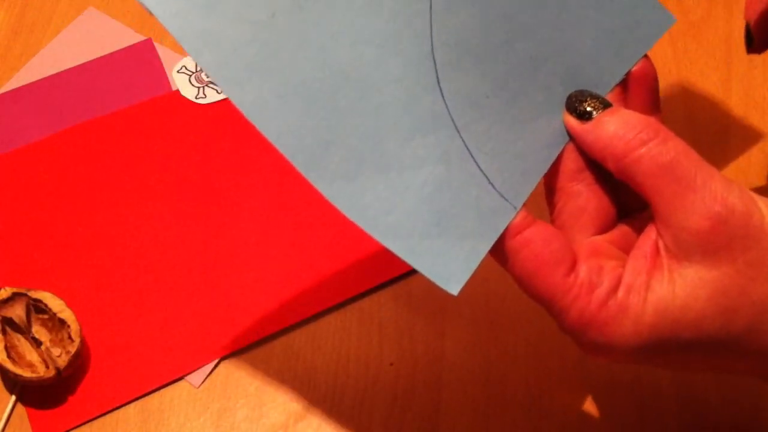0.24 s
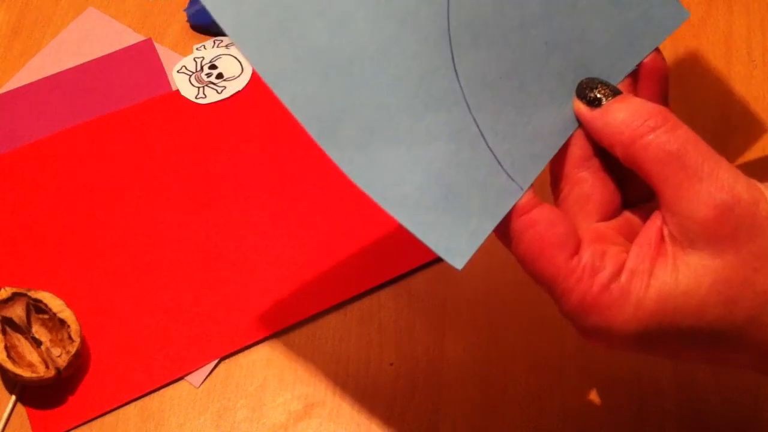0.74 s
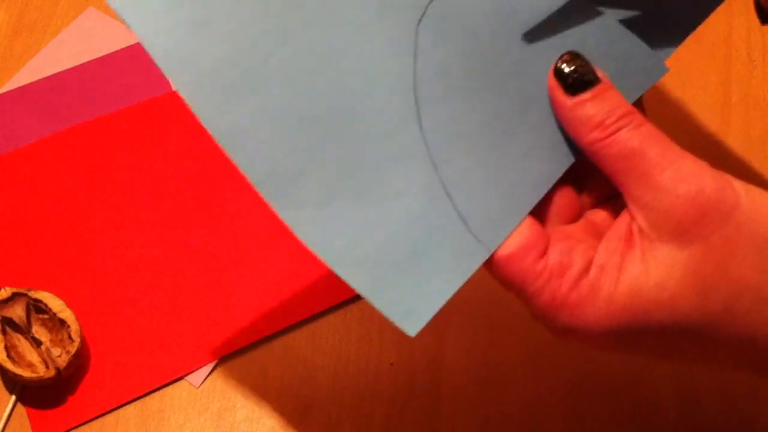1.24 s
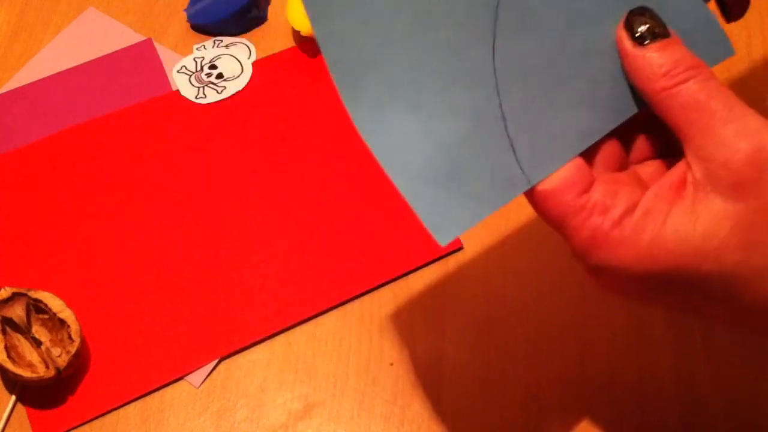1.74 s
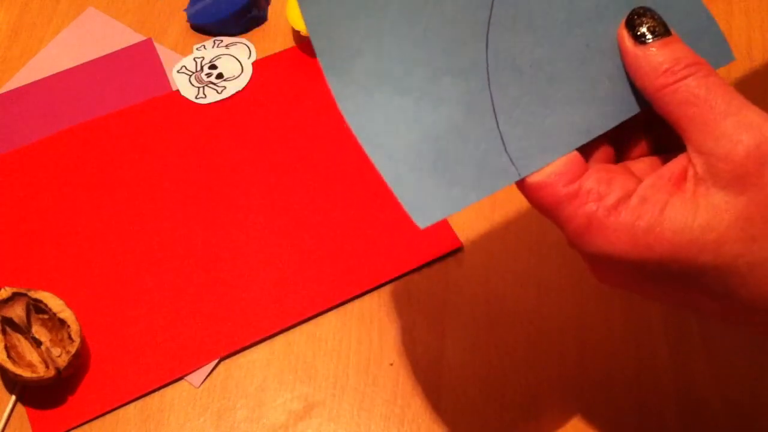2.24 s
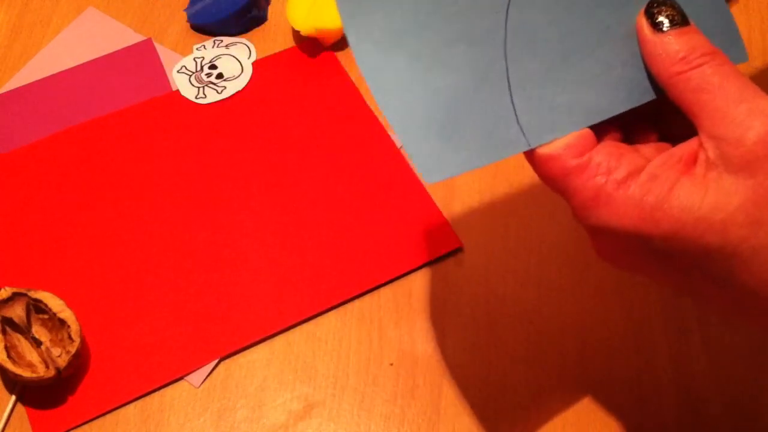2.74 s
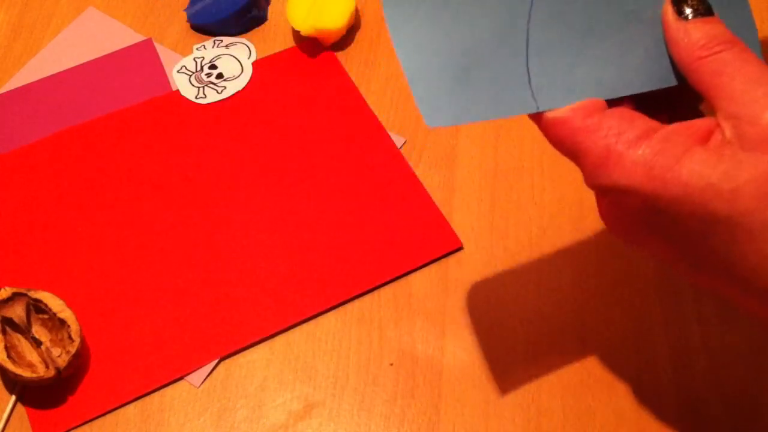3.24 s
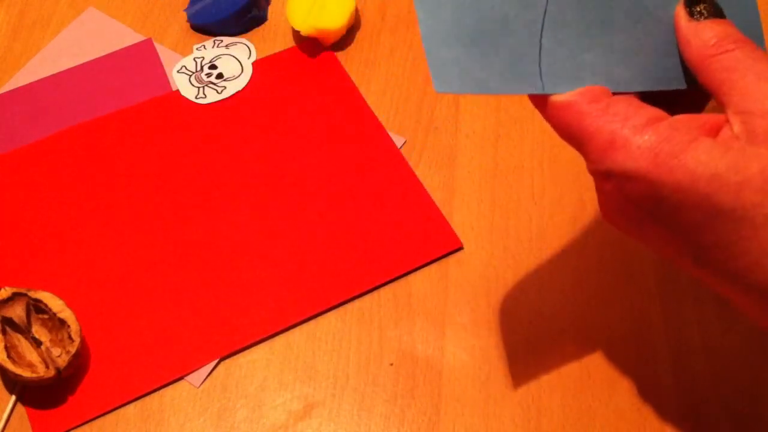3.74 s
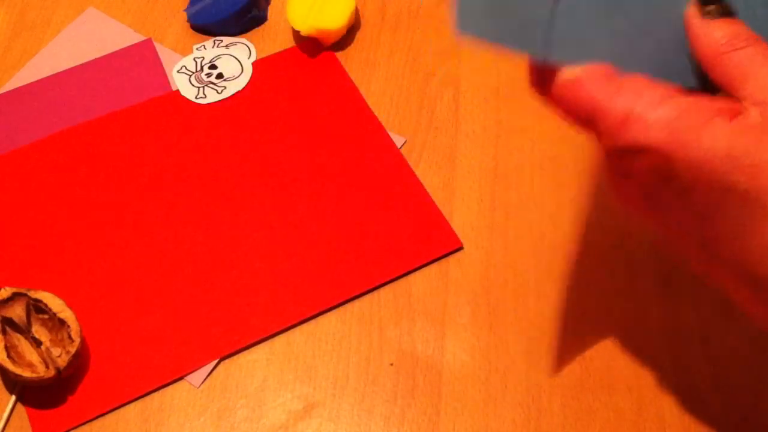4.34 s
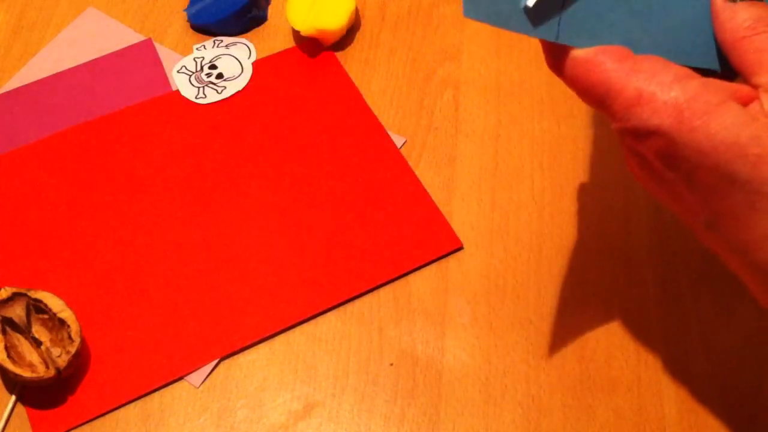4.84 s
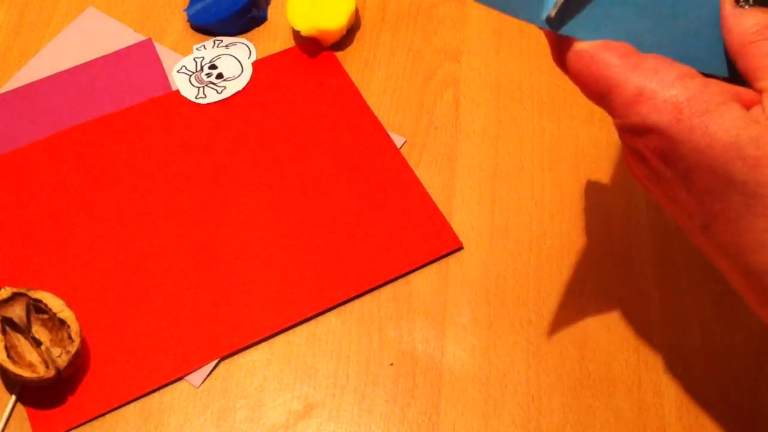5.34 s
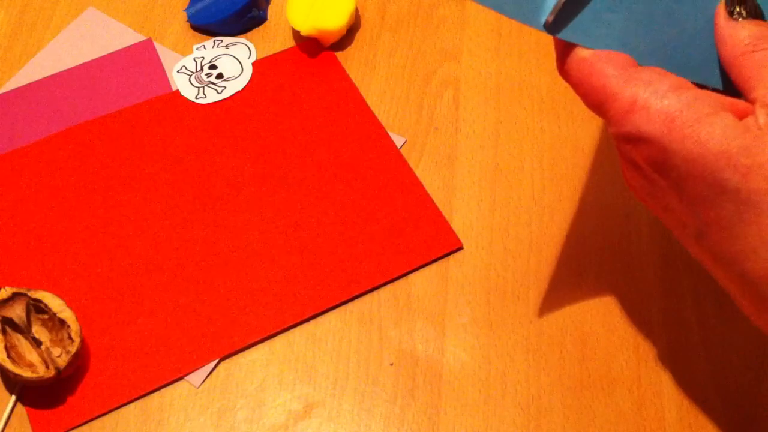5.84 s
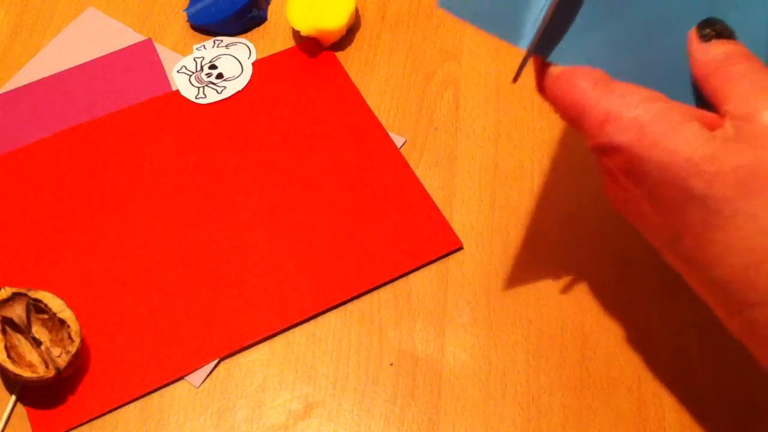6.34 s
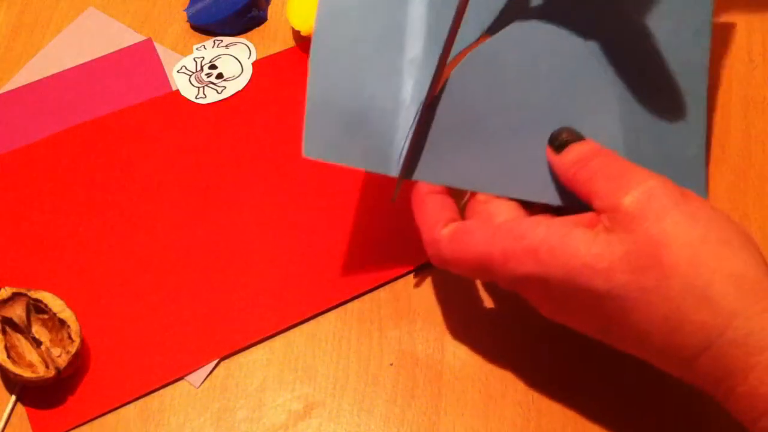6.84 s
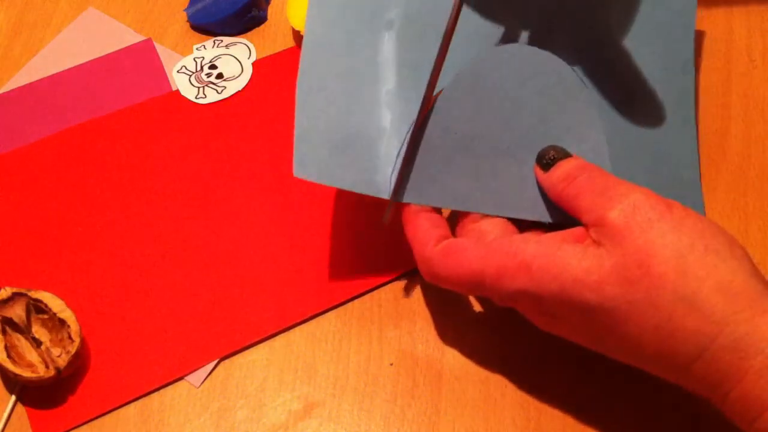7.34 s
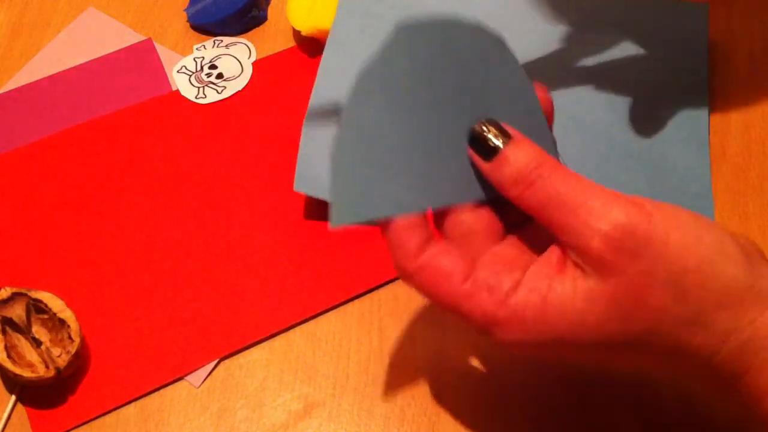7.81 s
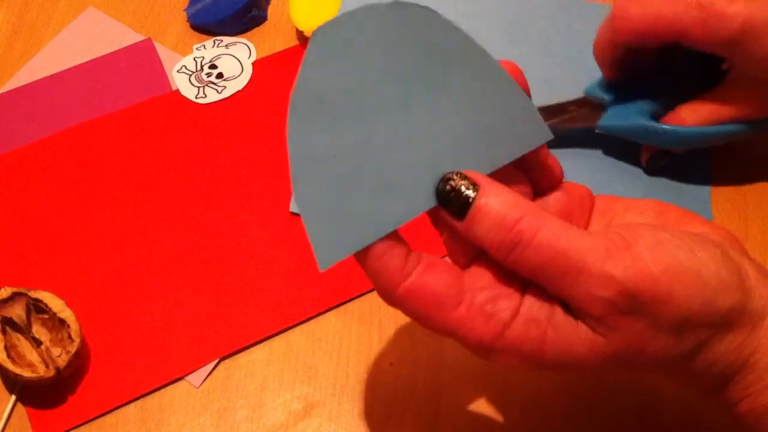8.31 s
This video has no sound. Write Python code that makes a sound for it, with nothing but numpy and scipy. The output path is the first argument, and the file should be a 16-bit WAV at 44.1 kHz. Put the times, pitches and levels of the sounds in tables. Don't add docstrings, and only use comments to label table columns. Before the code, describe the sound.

Close, dry crackling of stiff card being snipped in a quiet room, ending with a bright metallic blade snap and light sheet rustle.

```python
import sys
import numpy as np
from scipy import signal
from scipy.fft import rfft, irfft
from scipy.io import wavfile
from scipy.ndimage import uniform_filter1d, minimum_filter1d

SR = 44100
rng = np.random.default_rng(int(sys.argv[2]) if len(sys.argv) > 2 else 0)


def bounce(signal):
    frames = np.transpose(np.atleast_2d(signal))
    limited = np.clip(frames, -1, 1)
    pcm = np.round(limited * 32767).astype(np.int16)
    wavfile.write(sys.argv[1], SR, pcm)


def gain_from_decibels(decibels):
    exponent = np.asarray(decibels, float) / 20
    return 10 ** exponent


N = 377937

# centre in Hz, width in Hz, level in dB.
CRACKLE = [(1757, 970, 0.5), (2760, 1380, 1), (3590, 1080, 0), (5240, 1780, 1), (6410, 3400, -5)]
# centre in Hz, width in Hz, level in dB.
FIZZ = [(9100, 2660, -8), (12500, 2460, 5), (15600, 1300, -3.5)]


def bursts():
    panel_band_hz = [330, 1500]
    out, lead = np.zeros(N + SR), SR // 40
    t = (np.arange(SR // 10) - lead) / SR
    push = np.pad(fibres(spread_db=2.0), (lead, SR))
    radiated = signal.butter(1, panel_band_hz, "band", fs=SR)
    for s, db, panel_db, fizz_db, rise_ms, panel, rings in knocks() + slips() + ticks() + brushes():
        at = slice(int(s * SR), int(s * SR) + len(t))
        rise = 0.8 * np.clip(rise_ms, 0.2, 12) / 1000
        swell = np.where(t < 0, np.exp(-(t / rise) ** 2), np.exp(-np.abs(t) / (0.0015 + 0.94 * rise)))
        swell += 5.2 * np.exp(-rise / 0.00043 - np.abs(t) / 0.0001)
        burst = push[at] * swell
        burst *= gain_from_decibels(db) * np.linalg.norm(swell) / np.linalg.norm(burst)
        sudden = np.exp(-rise / 0.0017)
        flick = np.linalg.norm(burst) * (t == 0)
        jolt = np.sqrt(1 - sudden) * burst + np.sqrt(sudden) * flick
        out[at] += lifted(body(burst, tilted(CRACKLE, fizz_db)), rings)
        out[at] += gain_from_decibels(fizz_db) * body(burst, FIZZ)
        ringing = unit(body(signal.lfilter(*radiated, jolt), panel))
        out[at] += gain_from_decibels(panel_db + 1.5) * np.std(jolt) * ringing
    return out[lead:lead + N]


def knocks():
    # peak in seconds, crackle in dB, panel in dB re crackle, panel in Hz, rise in ms.
    knock_rows = [(0.028, -57.5, 8.5, 686, 1.8), (0.1102, -50.5, 16, 658, 1.6),
                  (0.6216, -38.5, 8.5, 710, 0.97), (0.7156, -32, 6, 625, 3.6),
                  (0.9661, -33.5, 11, 600, 1.17), (1.392, -49.5, 0.5, 560, 6.1),
                  (2.1179, -49.5, 1.5, 700, 2.7), (2.685, -50.5, 18, 646, 1.3),
                  (2.6933, -41.5, 10, 860, 2.9), (2.7078, -49, -3, 363, 3.3), (2.7369, -39, 0.5, 714, 2.9),
                  (2.762, -51.5, 9.5, 744, 2.5), (2.82, -51, 3.5, 730, 6.8), (2.9528, -43.5, 1, 640, 3.3),
                  (2.977, -44, 0.5, 706, 3.9), (2.9898, -51.5, 10.5, 700, 1.4),
                  (3.76, -39.5, 1.5, 682, 0.96), (4.1417, -42.5, 4.5, 580, 3.2),
                  (4.2045, -33, 2.5, 596, 1.9), (4.5533, -44, 3.5, 627, 0.79),
                  (5.0109, -38, -0.5, 710, 3.7), (5.247, -47.5, 3.5, 636, 2.9), (5.299, -47, 1.5, 636, 3.8)]
    rows = []
    for s, db, panel_db, hz, rise_ms in knock_rows:
        grip = [(hz, 55, 0), (1.445 * hz, 150, -9.5), (0.84 * hz, 70, -7), (2.4 * hz, 300, -15),
                (0.66 * hz, 150, -14)]
        fizz_db = edge(s) - 1.5 + 0.2 * panel_db
        rows.append((s, db, panel_db, fizz_db, rise_ms, grip, bent_rings(s)))
    return rows


def slips():
    # peak in seconds, crackle in dB, panel in dB re crackle, rise in ms.
    at_pivot = [(3.7113, -41.5, -2.5, 0.91), (3.993, -36.5, -1.5, 1.76), (4.002, -49, -12, 8.6),
                (4.1873, -28.5, -4.5, 2.7), (4.2646, -46.5, -11, 1.3), (5.6704, -44.5, -9, 2.2),
                (5.8205, -44.5, -10, 1.1), (6.4414, -44.5, -7, 4.7), (7.1487, -43, -27, 2),
                (7.2256, -53.5, -12.5, 6.9), (7.366, -46.5, -8.5, 1.5)]
    inner = [(0.216, -48.5, -34, 7.1), (1.0067, -47, -5, 7.3), (1.1234, -40.5, -33, 5.1),
             (2.0563, -57, -2, 2.8), (2.1346, -45.5, -4, 2.4), (2.174, -47.5, 0, 5.3),
             (2.3242, -46.5, 3, 4.3), (3.8809, -32, -3.5, 1.3), (4.0833, -35, 0.5, 1.1),
             (5.0625, -43.5, -3, 4.7), (5.621, -34, -7.5, 3), (5.734, -54, -2, 2.2),
             (5.7864, -42.5, -11, 4), (6.2507, -48.5, -9, 2.4), (6.2622, -58, -4, 2.5)]
    middle = [(0.012, -56, -1, 1.3), (0.7383, -50, -5, 3.2), (1.676, -45, -9, 8.8), (2.4116, -55, -3, 2.9),
              (2.9275, -49, -3.5, 5.6), (3.3614, -52, -24, 1.2), (4.2168, -39.5, -8.5, 3.2),
              (4.9783, -46.5, -0.5, 2.9), (5.377, -53.5, -4, 3.8), (5.4836, -44, -3.5, 4.7),
              (5.6412, -41, -12, 2.4), (6.0145, -42.5, -16, 4.6), (7.4449, -31, -11.5, 3.2),
              (7.4474, -24.5, -42.5, 0.63), (8.0704, -41, -14, 0.8)]
    outer = [(6.8497, -52.5, -19, 1.3), (7.439, -44, -24, 1.5), (7.533, -40, -24, 1),
             (7.5459, -52.5, -6, 6.1), (8.0825, -36, -15, 0.6), (8.3828, -40.5, -8.5, 1.6)]
    at_tips = [(1.6065, -37.5, -18, 2.1), (2.0784, -52, -2, 1.8), (2.0976, -45.5, -4, 4.8),
               (2.207, -49.5, -12, 2.8), (2.4235, -51.5, -4, 1.9), (2.4925, -38.5, -4, 4.6),
               (2.521, -40.5, -2, 2.5), (2.5861, -39.5, -3.5, 3.8), (3.4029, -28, -13.5, 1.6),
               (4.329, -51, -12, 1.2), (4.9471, -37.5, -9.5, 5.7), (5.1353, -45, -6, 7.8),
               (5.366, -47, -19, 3.4), (6.2796, -44.5, -3.5, 3.5), (6.3041, -36.5, -18, 3.1),
               (6.7401, -44, -7.5, 2.1), (7.1132, -49, -11.5, 2.3), (7.1258, -44, -13, 2),
               (7.5658, -49, -8, 2.2)]

    def at_place(slip_rows, crackle_hz, fizz_db):
        return [contact(s, db, panel_db, edge(s) + fizz_db, rise_ms, crackle_hz)
                for s, db, panel_db, rise_ms in slip_rows]

    rows = at_place(at_pivot, crackle_hz=1365, fizz_db=-2.3)
    rows += at_place(inner, crackle_hz=2180, fizz_db=0.5)
    rows += at_place(middle, crackle_hz=3600, fizz_db=1)
    rows += at_place(outer, crackle_hz=4300, fizz_db=-1.7)
    return rows + at_place(at_tips, crackle_hz=5110, fizz_db=-2.6)


def ticks():
    # peak in seconds, level in dB.
    tick_rows = [(1.4108, -65), (1.927, -64), (3.609, -56.5), (3.657, -55), (4.053, -62), (4.24, -57),
                 (4.8017, -60), (4.92, -60), (5.211, -56), (5.7, -57), (6.1271, -62), (6.8878, -60)]
    return [contact(s, db, -9, edge(s), rise_ms=1.5, place_hz=2700) for s, db in tick_rows]


def brushes():
    # peak in seconds, level in dB, panel in dB re crackle.
    brush_rows = [(0.093, -66, 0.5), (0.348, -64, -1), (0.439, -67, 2), (1.0436, -67, 4), (1.095, -61, 1.5),
                  (1.45, -61, 0), (1.523, -60, -7), (1.5385, -68, -12), (1.6914, -79, 7),
                  (2.3706, -67, -10), (2.4634, -65, -16), (2.883, -59.5, -2), (3.1, -61, -4),
                  (3.3224, -71, -17), (4.2893, -68, -2), (4.6604, -50, -18), (4.688, -58, -8),
                  (5.422, -61, -5), (7.828, -71, -24.5), (7.912, -63.5, 1), (8.565, -66, 6),
                  (8.1644, -64, -20)]
    return [contact(s, db, panel_db, edge(s), rise_ms=14, place_hz=1900) for s, db, panel_db in brush_rows]


def contact(s, db, panel_db, fizz_db, rise_ms, place_hz):
    sheet = [(265, 90, 0.5), (430, 200, -2.5), (bend(s)[0], 90, 5), (1050, 400, -7)]
    rings = bent_rings(s) + [(place_hz, 0.15 * place_hz, 2)]
    return s, db, panel_db, fizz_db, rise_ms, sheet, rings


def bent_rings(s):
    return [(hz, 0.047 * hz, 4) for hz in bend(s)[1:]]


def bend(s):
    # start in seconds, panel in Hz, low ring in Hz, high ring in Hz.
    bend_rows = [(0.206, 867, 2550, 2960), (0.616, 724, 1570, 5740), (0.709, 650, 2420, 4570),
                 (0.96, 630, 2510, 6740), (1.116, 896, 1830, 4900), (1.386, 600, 2265, 4200),
                 (1.6, 640, 1820, 4780), (1.776, 750, 2350, 2900), (2.091, 690, 3000, 5180),
                 (2.168, 920, 2410, 5060), (2.296, 817, 1800, 3570), (2.486, 537, 2280, 5050),
                 (2.516, 745, 2390, 5030), (2.58, 727, 1930, 5210), (2.688, 887, 1756, 4590),
                 (2.731, 770, 2370, 4840), (2.946, 669, 2770, 4980), (3.396, 720, 2440, 5000),
                 (3.705, 920, 1520, 5920), (3.754, 760, 1603, 4000), (3.876, 780, 1830, 4130),
                 (3.987, 420, 1880, 5400), (4.078, 736, 1890, 6160), (4.136, 547, 1780, 4000),
                 (4.181, 647, 1750, 6100), (4.199, 634, 1780, 4750), (4.366, 656, 2370, 5360),
                 (4.406, 916, 2870, 2900), (4.446, 740, 2300, 3580), (4.547, 620, 2330, 5400),
                 (4.571, 730, 2406, 5750), (4.606, 920, 2430, 5400), (4.656, 750, 2350, 4580),
                 (4.716, 685, 2440, 4840), (4.941, 896, 2710, 4030), (5.004, 726, 2420, 5050),
                 (5.056, 670, 2620, 6220), (5.129, 887, 2780, 4820), (5.357, 713, 1860, 4160),
                 (5.477, 665, 2740, 5580), (5.613, 645, 2180, 5240), (5.781, 758, 2370, 5820),
                 (6.008, 706, 2850, 5400), (6.296, 410, 2685, 5330), (6.435, 643, 2950, 3000),
                 (7.121, 1090, 1860, 4860), (7.43, 650, 2500, 5430), (7.527, 500, 2960, 3584),
                 (8.066, 670, 2620, 3120), (8.377, 1100, 2700, 4100)]
    table = np.array(bend_rows)
    latest = np.clip(np.searchsorted(table[:, 0], s) - 1, 0, None)
    return table[latest, 1:].T


def edge(s):
    # time in seconds, fizz in dB re crackle or rasp.
    facing = [(0, -9), (0.45, -33), (0.75, -11), (1.05, -8.5), (1.4, -15.5), (1.7, -12.5), (2.1, -7.5),
              (2.5, -12), (3.2, -3.5), (3.9, -11), (4.7, -5), (5.1, -1.5), (5.6, -2), (6.7, -2),
              (7.4, -3.5), (7.6, -6), (8.57, -7.5)]
    return np.interp(s, *np.transpose(facing))


def card_rubs():
    # peak in seconds, rise in ms, fall in ms, rasp in dB, panel in dB re rasp.
    cuts = [(1.6, 54, 34, -56, -5.5), (1.8, 36.5, 57, -46.5, -11.5), (2.31, 46, 51, -57, -8),
            (2.97, 59, 40, -56.5, 0.5), (3.05, 37, 32.5, -56.5, -4.5), (3.402, 25.3, 28, -48.5, -9.5),
            (3.66, 66, 64, -60, -17), (3.74, 50, 74, -56, -11), (4.2, 30, 52, -52.5, 0),
            (4.411, 11, 77, -47.5, -12.5), (4.462, 62, 47, -46, -10), (4.59, 46.7, 106, -49, -9),
            (4.73, 55, 66, -55, -14), (5.24, 33, 61, -59.5, -6.5), (5.83, 24, 49, -62.5, -4),
            (6.035, 20, 70.5, -48.5, -16.5), (6.62, 43, 28, -64, -26), (6.72, 51, 45, -55.5, -19),
            (8.24, 35, 53, -58.5, -21)]
    # peak in seconds, fall in ms, rasp in dB, panel in dB re rasp.
    scrapes = [(0.213, 17.7, -64.5, 9), (0.731, 41, -56.5, 4.5), (0.977, 66, -46.5, -5),
               (1.129, 50, -58, 0.5), (1.616, 45, -42.5, -14), (1.717, 28, -52.5, -1.5),
               (4.377, 19.5, -46.5, -5.5), (5.368, 18, -58.5, -3), (5.64, 94, -65, -0.5),
               (7.458, 55, -50, -13), (7.545, 44, -63.5, 1), (8.09, 36, -55, -13)]
    # peak in seconds, length in ms, rasp in dB, panel in dB re rasp.
    rustles = [(0.01, 61, -70, 15.5), (0.28, 50, -69.5, -0.5), (0.42, 240, -75, 1.5),
               (1.065, 93, -60, -3.5), (1.45, 220, -61.5, -6), (2.139, 250, -64, -2), (2.395, 104, -65, -6),
               (2.61, 383, -61, -4.5), (2.74, 120, -78, 5), (3.25, 470, -68, -24), (3.865, 126, -60, -7.5),
               (4.995, 150, -80.5, 15), (6.274, 96, -64.5, 4), (6.875, 97, -68, -3.5),
               (7.14, 66, -74.5, 3.5)]
    rows = list(cuts)
    rows += [(s, 14.3, fall_ms, db, panel_db) for s, fall_ms, db, panel_db in scrapes]
    rise_share = 0.39
    rows += [(s, rise_share * ms, (1 - rise_share) * ms, db, panel_db) for s, ms, db, panel_db in rustles]
    rows = [(*row, edge(row[0]) + 1.2) for row in rows]
    return strokes(rows, CRACKLE, grit_db=2.5, ring_db=-9.5, patchy_db=2.5)


def paper_swishes():
    # peak in seconds, rise in ms, fall in ms, level in dB, fizz in dB.
    swishes = [(7.825, 36, 50, -66, 5), (7.925, 55, 100, -57, -6), (8.0, 350, 1400, -72, -2.5),
               (8.56, 51, 140, -51.5, -4), (8.5, 43, 36, -62, -11)]
    # centre in Hz, width in Hz, level in dB.
    paper = [(2500, 2100, -5.5), (5300, 1100, 2.5), (7500, 2200, -7)]
    panel_db = -20.5
    rows = [(s, rise_ms, fall_ms, db, panel_db, fizz_db) for s, rise_ms, fall_ms, db, fizz_db in swishes]
    return strokes(rows, paper, grit_db=2.5, ring_db=-19, patchy_db=0.7)


def strokes(rows, colour, grit_db, ring_db, patchy_db):
    # centre in Hz, width in Hz, level in dB.
    held_sheet = [(250, 83, -1), (469, 204, -2), (920, 490, -4)]
    db, panel_db, fizz_db = np.transpose(rows)[3:]
    push = fibres(grit_db) * gain_from_decibels(2.0 * walk(200))
    out = domes(rows, db + fizz_db) * body(fibres(grit_db), FIZZ)
    for modes, part_db in ((tilted(colour, fizz_db), db), (held_sheet, db + panel_db)):
        total_hz = sum(width for _, width, _ in modes)
        for k, (hz, width, mode_db) in enumerate(modes):
            bending = gain_from_decibels(patchy_db * walk(30)) * np.sqrt(1.64 * width / total_hz)
            ring = body(push, [(hz, width, 0)])
            out += (-1) ** k * domes(rows, part_db + mode_db) * bending * ring
    panel_hz, low_hz, high_hz = bend(np.arange(N) / SR)
    out += domes(rows, db + panel_db - 1.5) * gliding(push, panel_hz, 130)
    push = fibres(grit_db) * gain_from_decibels(4.0 * walk(150))
    rings = gliding(push, low_hz, 230) + gain_from_decibels(-2.5) * gliding(push, high_hz, 600)
    out += domes(rows, db + ring_db) * rings
    return gain_from_decibels(1.3 * walk(80)) * out


def domes(rows, levels_db):
    out = np.zeros(N + 2 * SR)
    for (s, rise_ms, fall_ms, *_), db in zip(rows, levels_db):
        rise, fall = int(rise_ms * SR / 1000), int(fall_ms * SR / 1000)
        ramp = np.append(np.linspace(0, 1, rise), np.linspace(1, 0, fall))
        out[SR + int(s * SR) - rise:][:len(ramp)] += gain_from_decibels(db) * np.sin(np.pi / 2 * ramp) ** 0.7
    return out[SR:SR + N]


def gliding(x, hz, width_hz):
    turn = np.exp(2j * np.pi * np.cumsum(uniform_filter1d(hz, size=400)) / SR)
    ring = signal.lfilter([1], [1, -np.exp(-np.pi * width_hz / SR)], x / turn)
    return unit((turn * ring).real) * np.std(x)


def fibres(spread_db):
    return unit(rng.standard_normal(N) * gain_from_decibels(spread_db * rng.exponential(size=N)))


def tilted(modes, fizz_db):
    return [(hz, width, db + 0.34 * (fizz_db + 8.0) * np.log2(hz / 2500)) for hz, width, db in modes]


def resonance(x, hz, width):
    return signal.lfilter(*signal.iirpeak(hz, hz / width, fs=SR), x)


def body(x, modes):
    rings = (gain_from_decibels(db) * resonance(x, hz, width) for hz, width, db in modes)
    return unit(sum((-1) ** k * ring for k, ring in enumerate(rings))) * np.std(x)


def lifted(x, rings):
    ringing = sum(gain_from_decibels(db) * resonance(x, hz, width) for hz, width, db in rings)
    return unit(x + ringing) * np.std(x)


def walk(rate):
    k = int(SR / rate)
    return uniform_filter1d(np.repeat(rng.standard_normal(N // k + 1), k), k)[:N]


def unit(x):
    return x / np.sqrt(np.mean(x ** 2))


def thumps():
    # start in seconds, level in dB, pitch in Hz, t60 in seconds.
    thump_rows = [(0.618, -48, 288, 0.067), (0.961, -40.5, 277, 0.21), (1.387, -47.5, 254, 0.081),
                  (1.611, -49.5, 186, 0.36), (2.688, -33.5, 213, 0.1), (3.404, -41.5, 173, 0.27),
                  (3.757, -50.5, 278, 0.18), (4.187, -59.5, 278, 0.55), (5.615, -47.5, 278, 0.11),
                  (5.784, -55.5, 261, 0.38), (6.306, -46.5, 275, 0.1), (8.08, -58.5, 330, 0.2)]
    out, t = np.zeros(N + SR), np.arange(SR // 3) / SR
    for s, db, hz, t60 in thump_rows:
        phase = 2 * np.pi * hz * (0.8 * t + 0.0106 * (1 - np.exp(-t / 0.055)))
        rumble = body(rng.standard_normal(len(t)), [(0.65 * hz, 60, 0), (1.6 * hz, 140, -2)])
        swell = (1 - np.exp(-t / 0.0016)) * np.exp(-np.log(1000) * t / t60)
        out[int(s * SR):][:len(t)] += gain_from_decibels(db) * (0.73 * np.sin(phase) + 0.72 * rumble) * swell
    return out[:N]


def table_hum():
    # peak in seconds, rise in ms, fall in ms, level in dB.
    hums = [(8.13, 40, 70, -67), (8.25, 30, 60, -71), (8.35, 40, 80, -69), (8.47, 60, 90, -73)]
    hz = 261 + 5 * walk(40)
    return domes(hums, np.transpose(hums)[3]) * np.sin(2 * np.pi * np.cumsum(hz) / SR)


def snaps():
    # start in seconds, level in dB.
    snap_rows = [
        (7.4468, -17),
        (0.969, -44),
    ]
    # mode in Hz, level in dB, t60 in seconds.
    blades = [(1467, -14, .015), (2490, -10, .03), (2800, -11, .01), (4500, -5, .01), (5400, -5, .012),
              (6385, -5, .018), (6720, -13, .11), (6800, 0, .04), (7003, -9, .05), (7780, -3, .015),
              (8780, -2, .012), (10300, -3, .012)]
    out, t = np.zeros(N + SR), np.arange(SR // 4) / SR
    steel = sum(gain_from_decibels(db) * np.sin(2 * np.pi * hz * t) * np.exp(-np.log(1000) * t / t60)
                for hz, db, t60 in blades)
    steel = signal.lfilter(*signal.butter(2, 900, "high", fs=SR), steel)
    for s, db in snap_rows:
        chatter = 0.3 * rng.standard_normal(size=400) * np.exp(-t[:400] / 0.003)
        rattle = signal.fftconvolve(chatter, steel * np.exp(-t / 0.002))[:len(t)]
        out[int(s * SR):][:len(t)] += gain_from_decibels(db - 3.5) * (0.9 * steel + rattle)
    return out[:N]


def room(x):
    t60_s, tail_db, top_hz = 0.15, -15, 4000
    t = np.arange(SR // 2) / SR
    tail = rng.standard_normal(len(t)) * np.exp(-np.log(1000) * t / t60_s) * (t > 0.003)
    tail = signal.lfilter(*signal.butter(1, top_hz, fs=SR), tail)
    return x + gain_from_decibels(tail_db) * signal.fftconvolve(x, tail / np.linalg.norm(tail))[:N]


def table_shake(x):
    dull = signal.lfilter(*signal.butter(2, 900, fs=SR), x)
    return signal.sosfilt(signal.butter(2, [40, 110], "band", fs=SR, output="sos"), np.abs(dull))


def air():
    # frequency in Hz, density in dB per Hz.
    spectrum = [(25, -13), (60, -26), (100, -10), (158, 2.5), (465, -9), (1240, -12.5), (5170, -15.5),
                (14900, -17.5), (16000, -17)]
    hz, db = np.transpose(spectrum)
    shape = gain_from_decibels(np.interp(np.log(np.fft.rfftfreq(N, 1 / SR) + 1), np.log(hz), db))
    return gain_from_decibels(-69 + 1.6 * walk(5.6)) * unit(irfft(rfft(rng.standard_normal(N)) * shape, N))


def scene():
    hands = bursts() + card_rubs() + paper_swishes() + thumps() + table_hum() + snaps()
    thinned = signal.sosfilt(signal.butter(4, 120, "high", fs=SR, output="sos"), room(hands))
    return (thinned + gain_from_decibels(-19.5) * table_shake(hands) + air())[None]


def low_pass(x):
    return signal.sosfilt(signal.butter(12, 16650, fs=SR, output="sos"), x)


def record(dry):
    dry = signal.sosfilt(signal.ellip(6, 0.5, 40, 15900, fs=SR, output="sos"), dry)
    bass, mid = (signal.sosfiltfilt(signal.butter(2, hz, fs=SR, output="sos"), dry) for hz in (450, 5000))
    loud = np.sqrt(uniform_filter1d((dry - bass) ** 2, size=88) + 1e-14)
    ahead = -minimum_filter1d(-loud, size=481, origin=-240)
    top = np.sqrt(uniform_filter1d((dry - mid) ** 2, size=176) + 1e-14)
    around = -minimum_filter1d(-top, size=1601)
    keep_mid = uniform_filter1d(np.clip(loud / ahead * gain_from_decibels(25.5), 0, 1) ** 3, size=44)
    keep_top = uniform_filter1d(np.clip(top / around * gain_from_decibels(23.5), 0, 1) ** 3, size=44)
    return low_pass(bass + keep_mid * (mid - bass) + keep_top * (dry - mid))


dry = scene()
out = record(dry)
bounce(out)
```